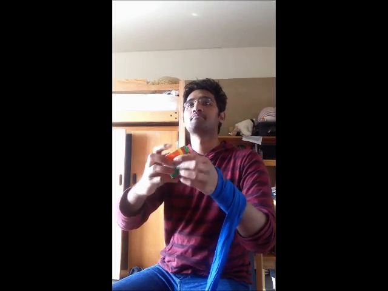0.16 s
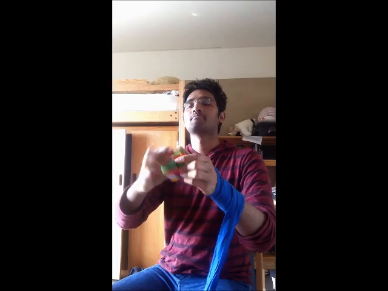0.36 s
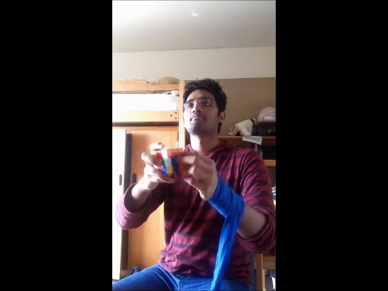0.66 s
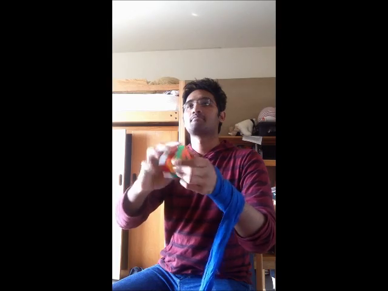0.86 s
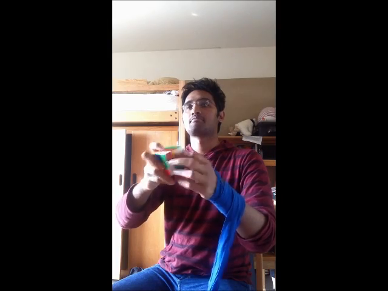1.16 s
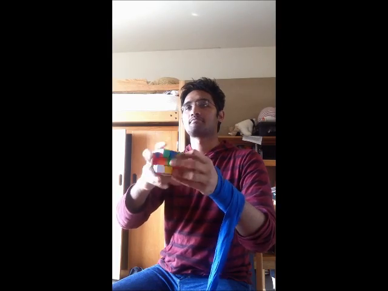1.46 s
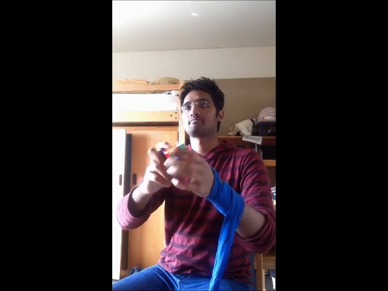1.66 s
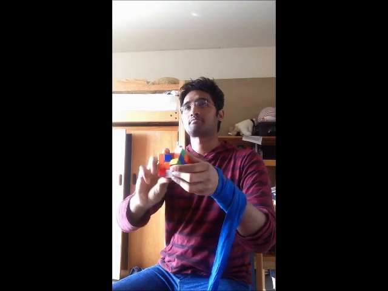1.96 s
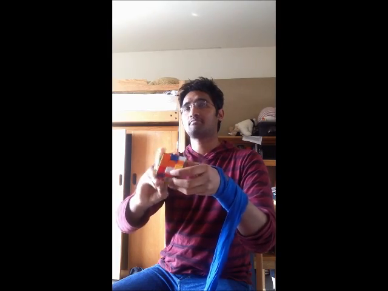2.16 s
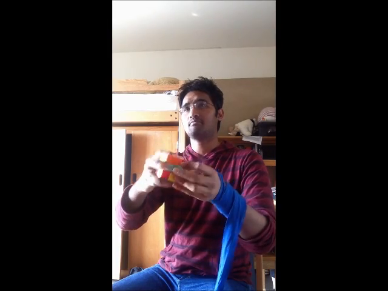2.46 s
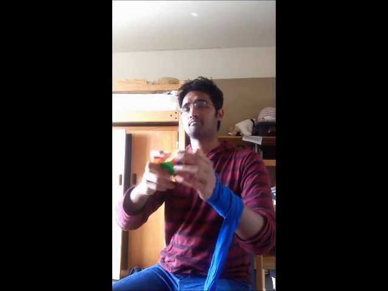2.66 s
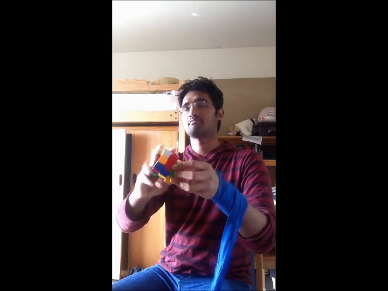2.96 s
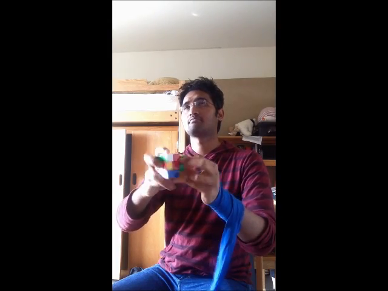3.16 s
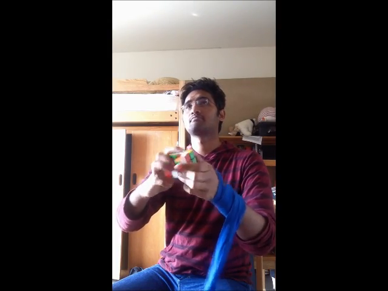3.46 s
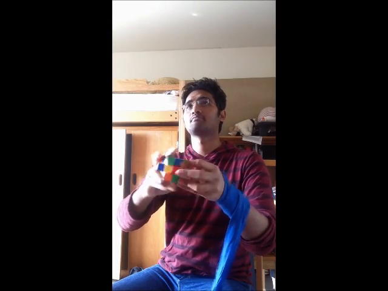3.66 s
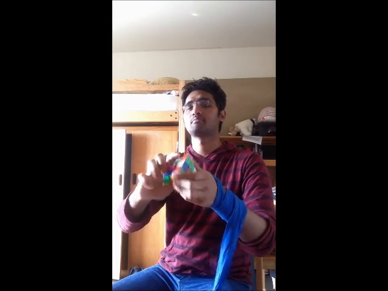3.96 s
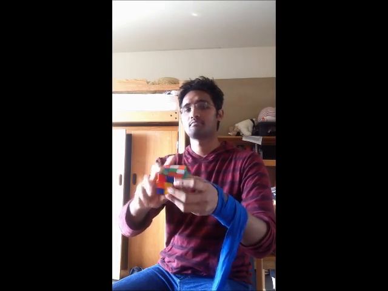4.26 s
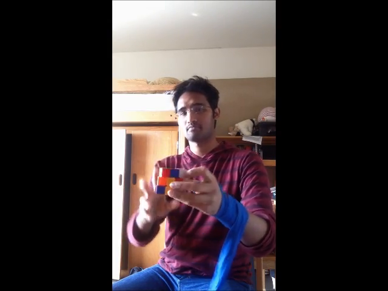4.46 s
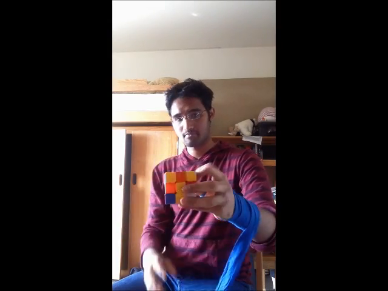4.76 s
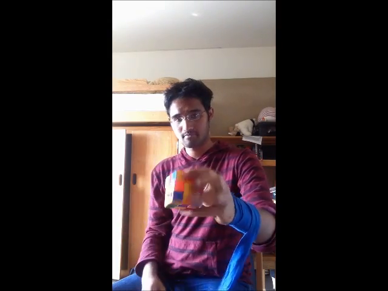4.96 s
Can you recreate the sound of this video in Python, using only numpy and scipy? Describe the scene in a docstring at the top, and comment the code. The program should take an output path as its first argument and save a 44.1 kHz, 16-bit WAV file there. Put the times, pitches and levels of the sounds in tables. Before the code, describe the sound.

Rapid, uneven plastic clicks and brief scrapes come from a puzzle cube's turning layers, over faint indoor hum.

```python
"""A plastic puzzle cube is twisted quickly by hand, a metre or two away in a small furnished room.
Its pieces clack together as each layer starts and stops, and rasp over each other while it turns.
Every knock is a crack plus the brief ring of a hollow shell, and sets the core ringing faintly.
A spring pings twice, there is one dull bump, and the room answers over low noise and fan hum."""
import sys
import numpy as np
from scipy import signal
from scipy.fft import rfft, irfft
from scipy.io import wavfile
from scipy.ndimage import uniform_filter1d

SR = 44100
rng = np.random.default_rng(int(sys.argv[2]) if len(sys.argv) > 2 else 0)


def unload_audio(sound):
    """Save the sound as a 16-bit wav file, at the path given as the first command line argument."""
    columns = np.transpose(np.atleast_2d(sound))
    # keep every value between -1 and 1, then stretch to whole-number steps
    steps = np.round(np.clip(columns, -1, 1) * 32767)
    wavfile.write(sys.argv[1], SR, steps.astype(np.int16))


N = 225792


def undb(db):
    """Decibels to gain."""
    return 10 ** (np.asarray(db) / 20)


def unit(x):
    """Scale to rms 1."""
    return x / np.sqrt(np.mean(x ** 2) + 1e-30)


def seconds(length):
    """A time axis."""
    return np.arange(int(length * SR)) / SR


def fade(t, t60):
    """Exponential decay, 60 dB down at t60."""
    return np.exp(-np.log(1000) * t / t60)


def add(track, start_s, x):
    """Mix x into the track from start_s on."""
    i = max(0, int(start_s * SR))
    track[i:i + len(x)] += x[:max(0, N - i)]


def band_pass(x, lo_hz, hi_hz, order):
    """Keep one band of a sound."""
    return signal.sosfilt(signal.butter(order, [lo_hz, hi_hz], "band", fs=SR, output="sos"), x)


def noise(spectrum):
    """Noise of rms 1, coloured by an EQ curve of (f/Hz, level/dB) points."""
    hz, db = np.transpose(spectrum)
    bins_hz = np.maximum(np.arange(N // 2 + 1) * SR / N, 1)
    curve = undb(np.interp(np.log(bins_hz), np.log(hz), db))
    return unit(irfft(rfft(rng.standard_normal(N)) * curve, N))


# colour of the room tone and microphone hiss: f/Hz, relative level/dB
ROOM_TONE_EQ = [(25, -33), (60, -18.5), (85, -24), (120, -6), (190, -4.5), (270, 4), (420, -7), (800, -6.5),
                (1300, -12), (2200, -17.5), (4000, -21), (9000, -20.5), (11000, -23.5), (15000, -22)]
# faint fan tones: f/Hz, level/dB
FAN_TONES = [(120, -95), (266, -73), (359, -75.5)]
def background(floor_db=-58, waver=0.00426):
    """A bed of low room tone and hiss, with fan tones that drift slightly in pitch."""
    out = undb(floor_db) * noise(ROOM_TONE_EQ)
    for hz, db in FAN_TONES:
        drift = unit(uniform_filter1d(rng.standard_normal(N), size=8000))
        phase = 2 * np.pi * np.cumsum(hz * (1 + waver * drift)) / SR
        out += undb(db) * np.sqrt(2) * np.sin(phase)
    return out


def room(x, send_db, near_db=-5, near_t60=0.089, wall_db=-9, low_t60=0.28, high_t60=0.25, split_hz=5000):
    """The dry sound, quick echoes off hands and chest, and a short wall tail that loses treble first."""
    t = seconds(.22)
    near, walls = rng.standard_normal((2, len(t)))  # the cube moves, so each sound takes new paths
    near = near * (t > .001) * fade(t, near_t60)
    pole = np.exp(-2 * np.pi * split_hz / SR)
    low = signal.lfilter([1 - pole], [1, -pole], walls)
    walls = (low * fade(t, low_t60) + (walls - low) * fade(t, high_t60)) * (t > .007)
    echoes = (undb(near_db) * unit(near) + undb(wall_db) * unit(walls)) / np.sqrt(len(t))
    return signal.fftconvolve(x, (t == 0) + undb(send_db) * echoes)


# dark colour of the bump: f/Hz, relative level/dB
BUMP_EQ = [(100, -33), (190, -13), (235, 2), (330, -17), (600, -24), (880, -9), (1200, -23), (2000, -14),
           (3200, -55)]
def bump(peak_s=2.742, peak_db=-48, slope_s=0.03):
    """One soft, muffled bump swells and dies away at the same rate."""
    t = np.arange(N) / SR - peak_s
    return undb(peak_db) * noise(BUMP_EQ) * np.exp(-np.abs(t) / slope_s)


def ring(t, modes, detune=0, scatter_db=0):
    """Decaying modes; detune and scatter shift their pitch and balance, as a blow on another spot does."""
    hz, db, t60 = np.transpose(modes)
    pitch, share = rng.standard_normal((2, len(hz)))
    gain = undb(db + scatter_db * share) * rng.choice([-1, 1], len(hz))
    partials = np.sin(2 * np.pi * np.outer(hz * (1 + detune * pitch), t))
    return gain @ (partials * fade(t, t60[:, None]))


# long, thin ring of the core and its springs: f/Hz, relative level/dB, t60/s
CORE_MODES = [(889, -2, .09), (1403, 1, .09), (2138, 1, .08), (3577, -3, .1), (5739, -2, .09),
              (9016, -3, .06)]
# a spring's close, beating pair of modes: f/Hz, relative level/dB
SPRING_MODES = [(9380, 0), (9490, -4)]
# cues for a spring letting go: t/s, level/dB, t60/s
SPRING_PINGS = [(.01, -54, 0.18), (4.41, -57.5, 0.55)]
def springs(blows, core_db=-55):
    """The blows set the core ringing; twice a spring pings by itself."""
    t = seconds(.5)
    out = undb(core_db) * signal.fftconvolve(blows, ring(t, CORE_MODES))[:N]
    ping = sum(undb(db) * np.sin(2 * np.pi * hz * t) for hz, db in SPRING_MODES)
    for start_s, db, t60 in SPRING_PINGS:
        add(out, start_s, undb(db) * ping * fade(t, t60))
    return out


# hollow body of one plastic piece: f/Hz, relative level/dB, t60/s
SHELL_MODES = [(486, -30, 0.027), (656, -30, 0.026), (1027, -15, 0.027), (1419, -8.5, 0.029),
               (1886, -0.5, 0.0092), (2131, -1, 0.017), (2490, -3, 0.014), (3140, 0.5, 0.01),
               (3430, -6, 0.011), (3710, -3, 0.01), (4247, -5.5, 0.012), (5020, -4.5, 0.0053),
               (5840, 3.5, 0.0052), (6420, 6.5, 0.0038), (7690, 5, 0.0059), (8700, -1, 0.0038),
               (9190, -2.5, 0.0013), (12540, -3, .004), (13450, -11, 0.0053)]
def knock(crack_db=14, crack_t60=0.0029, bounce_db=-9):
    """Hard plastic meets plastic: a crack, the ring of the shell, and a weaker rebound."""
    t = seconds(.02)
    bursts = rng.standard_normal((2, len(t))) * fade(t, crack_t60)
    cracks = undb(crack_db) * band_pass(bursts, 1420, 15200, order=1)  # small pieces radiate little bass
    hit, rebound = (crack + ring(t, SHELL_MODES, detune=0.045, scatter_db=3) for crack in cracks)
    lag = int(rng.uniform(.0006, .003) * SR)
    return hit + undb(bounce_db) * np.pad(rebound, (lag, 0))[:len(t)]


def registers(x):
    """Split a sound into hollow clack, sharp snap and top tick."""
    clack = band_pass(x, 440, 4520, order=3)
    snap = band_pass(x, 4800, 10230, order=4)
    tick = band_pass(x, 11640, 18800, order=3)
    return clack, snap, tick


def chatter(size, per_s, scatter_db, pieces=4):
    """Friction as a run of tiny knocks of uneven strength, shared among several pieces."""
    shape = (pieces, size)
    strength = undb(scatter_db * np.clip(rng.standard_normal(shape), -2, 2))
    slipping = rng.random(shape) < per_s / pieces / SR
    slips = slipping * strength * rng.choice([-1, 1], shape)
    return sum(signal.oaconvolve(piece, knock()) for piece in slips)


LET_GO_S = 4.35  # one hand leaves the cube
def loose_pieces(grip_db=-62, settle_db_per_s=32):
    """The pieces rub and shift faintly under the fingers; they settle once a hand lets go."""
    shifts = chatter(N, per_s=130, scatter_db=5.5, pieces=6)
    muffled = band_pass(shifts, 620, 4400, order=1)
    resting_s = np.maximum(np.arange(N) / SR - LET_GO_S, 0)
    return unit(room(muffled, send_db=6.5)[:N]) * undb(grip_db - settle_db_per_s * resting_s)


# notes of a struck piece, the low one for soft contacts and the high one for hard:
# f/Hz, spread between pieces/octaves, level against the knock/dB, lift/dB per dB of hardness
PIECE_NOTES = [(3217, 0.16, -7.5, -0.2), (8640, 0.074, -12, 1.2)]
def click(clack_db, hardness_db, note_t60=0.0049, usual_clack_db=-47):
    """One knock with two notes damped by the grip; hardness is the snap's level above the clack."""
    hit = unit(knock())
    t = np.arange(len(hit)) / SR
    for hz, spread, note_db, lift in PIECE_NOTES:
        note_hz = hz * 2 ** (spread * rng.standard_normal())
        note = np.sin(2 * np.pi * note_hz * t) * fade(t, note_t60)
        hit = hit + undb(min(note_db + lift * hardness_db, 0)) * unit(note)
    # a hard or light contact is short, which lifts the top tick
    tick_db = -10.5 + 1.55 * hardness_db - 0.26 * (clack_db - usual_clack_db)
    gains = undb(clack_db + np.array([0, hardness_db, tick_db]))
    attack = int(.004 * SR)
    return sum(gain * part / np.std(part[:attack]) for part, gain in zip(registers(hit), gains))


def stray_knocks(per_s=5, level_db=-55.5, scatter_db=4, hardness_spread_db=3):
    """Loose pieces tap their neighbours at uneven moments while both hands are at work."""
    out = np.zeros(N)
    for slot in range(int(per_s * LET_GO_S)):
        force, hardness = np.clip(rng.standard_normal(2), -2, 2)
        tap = click(level_db + scatter_db * force, hardness_spread_db * hardness)
        add(out, (slot + rng.random()) / per_s, room(tap, send_db=5))
    return out


# cues for sliding layers; a pushed one swells, a flicked one runs down:
# start t/s, end t/s, clack level midway/dB, swell from start to end/dB
LAYER_TURNS = [(0, 0.316, -62, -10), (0.432, 0.536, -54, 7), (.616, 0.765, -51.5, -2),
               (0.918, 1.001, -47.5, 1), (1.086, 1.12, -47.5, 6), (1.144, 1.22, -51, -14),
               (1.343, 1.443, -50.5, -9), (1.492, 1.662, -51.5, 4.5), (1.795, 1.884, -52.5, -4.5),
               (2.31, 2.344, -52.5, -10), (2.557, 2.643, -47.5, 11), (2.815, 2.906, -49, -2),
               (2.909, 2.954, -44.5, 5), (3.596, 3.647, -43.5, -19), (3.746, 3.854, -44, -14),
               (3.991, 4.043, -49.5, 2.5), (4.393, 4.427, -51.5, -13), (4.66, 4.72, -58.5, -2)]
def rasp(even_snap_db=-4.5, dulling_per_swell=0.26, tick_over_snap_db=-9):
    """A turning layer catches and slips on the edges of its neighbours until it stops."""
    out = np.zeros(N)
    t = seconds(.35)
    for start_s, end_s, db, swell_db in LAYER_TURNS:
        grains = chatter(len(t), per_s=1600, scatter_db=4.5)[:len(t)]
        snap_db = even_snap_db - dulling_per_swell * swell_db  # a flick is brighter than a push
        gains = undb([0, snap_db, snap_db + tick_over_snap_db])
        scrape = sum(gain * unit(part) for part, gain in zip(registers(grains), gains))
        progress = np.minimum(t / (end_s - start_s), 1)
        pressure = undb(db + swell_db * (progress - .5)) * (progress < 1)
        add(out, start_s, room(pressure * scrape, send_db=0))
    return out


# cues for the lead clacks: t/s, clack level/dB, hardness/dB, room send/dB
TURN_CLACKS = [(0.0102, -48.5, 10.5, 2), (0.0276, -39, -1, 2), (0.3336, -47, -2.5, -4), (.398, -52, 7.5, 2),
               (.433, -52.5, -5, 7), (0.4661, -46.5, 6, 0), (0.4881, -42.5, -0.5, 4.5),
               (0.5097, -38, -12, -5), (.5517, -39.5, 1, 1), (0.6209, -38.5, 3, 5),
               (0.6622, -37.5, -5, 7.5), (0.7435, -39, -1, 3.5), (.8472, -46.5, 0.5, 4.5),
               (0.9132, -39, -5, 4.5), (.9381, -41, -4.5, 0), (0.963, -47, 7, -0.5), (1.1002, -32, 2, 5),
               (1.1052, -39.5, 4, 4), (1.142, -33.5, -4, -4), (1.154, -31.5, -5.5, 3),
               (1.2548, -56.5, 4.5, -2), (1.3478, -42, -6, 3), (1.3578, -56, 11.5, -2),
               (1.4436, -49.5, -3, 3.5), (1.4777, -51, 4, -1), (1.5389, -44, -2.5, 6),
               (1.552, -41, -0.5, 2.5), (1.6118, -30, -2, -0.5), (1.707, -50, 2, 3), (1.7294, -53, 3, -2),
               (1.817, -48, 0.5, -14), (1.8592, -56, 5.5, 9), (1.9468, -41, -4.5, .5),
               (2.0001, -51.5, -3, 3.5), (2.2221, -55, 1.5, 2), (2.281, -51, 3, 4), (2.3149, -47, 0, 9),
               (2.3223, -44, 0, -6), (2.4009, -47, -6.5, 5.5), (2.4461, -36, 8.5, 2.5),
               (2.451, -41.5, -2, 8), (2.55, -44.5, 0, -9), (2.5539, -38.5, 5, 2), (2.6015, -39.5, -0.5, 5),
               (2.6437, -44.5, 3.5, 4.5), (2.807, -48.5, 5, -0.5), (2.8416, -45, -2, 0),
               (2.8715, -45.5, 1, 0), (2.9073, -38, -1, 4.5), (2.9305, -36, -1.5, 6.5), (2.9486, -41, 0, 8),
               (3.0702, -57.5, 4, 8), (3.162, -52.5, -8.5, 0), (3.341, -44.5, -1, -4),
               (3.379, -50.5, 12.5, 0.5), (3.4571, -56.5, 0, 13), (3.4864, -43, 2.5, 4),
               (3.5335, -42.5, -0.5, 8), (3.58, -47.5, -1.5, 10), (3.6033, -34, -13, 7.5),
               (3.623, -42.5, 4, 5), (3.726, -52.5, -8, 11.5), (3.754, -30.5, -1, 0),
               (3.7565, -34.5, 3.5, 1), (3.7806, -35.5, 1, 5.5), (3.827, -40.5, 2, 1.5),
               (3.869, -46, 1, -2), (3.9385, -49, 1, 5.5), (4.0237, -41.5, -6.5, 0), (4.1614, -59, 3, 4),
               (4.1776, -36.5, -3, -2.5), (4.2758, -50.5, -3.5, 4.5), (4.3835, -49, -2, 1),
               (4.3958, -39.5, 0, 3), (4.415, -53.5, 11, 1), (4.544, -56, 2, 1), (4.6769, -50, -3, 8),
               (4.7197, -36, 6, 1.5), (4.8852, -49, -2.5, 8), (4.9152, -54.5, 4, 3.5),
               (4.9744, -47.5, -3.5, 0.5), (5.0536, -50, -2.5, 1.5)]
def turn_clacks():
    """Pieces knock as a layer starts, catches or lands; a hit shielded by the hands sounds roomier."""
    out = np.zeros(N)
    for start_s, clack_db, hardness_db, send_db in TURN_CLACKS:
        add(out, start_s, room(click(clack_db, hardness_db), send_db))
    return out


def scene():
    """Mono mix of the cube, its springs and the bump over the room tone."""
    cube = turn_clacks() + rasp() + loose_pieces() + stray_knocks()
    return (cube + springs(cube) + bump() + background())[None]


def record(dry):
    """A phone's steep high cut at 15.2 kHz takes off the top air."""
    return signal.sosfilt(signal.ellip(10, .2, 70, 15200, fs=SR, output="sos"), dry)


dry = scene()
out = record(dry)
unload_audio(out)
```